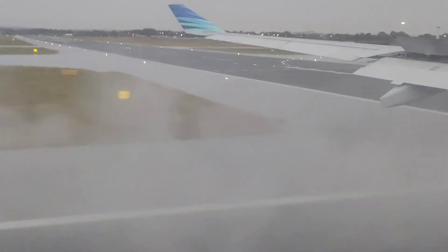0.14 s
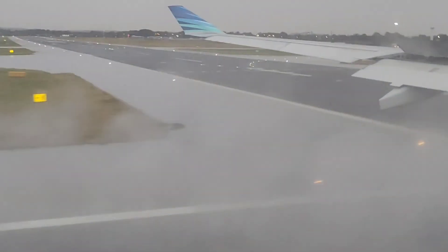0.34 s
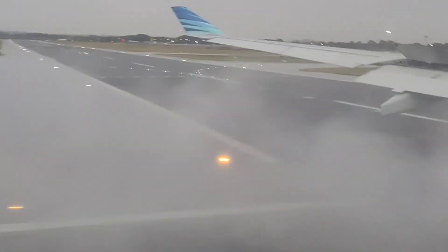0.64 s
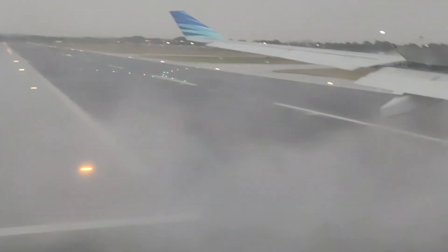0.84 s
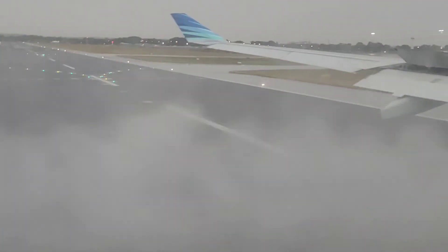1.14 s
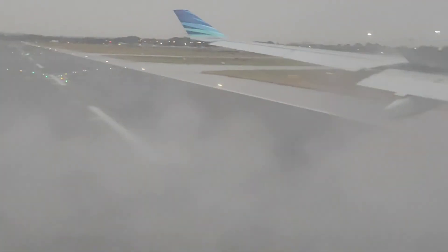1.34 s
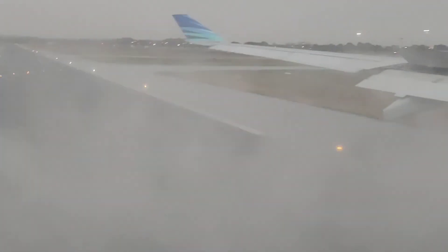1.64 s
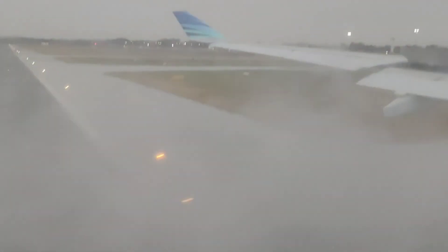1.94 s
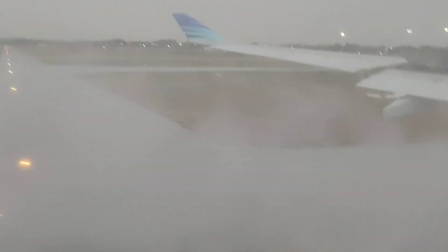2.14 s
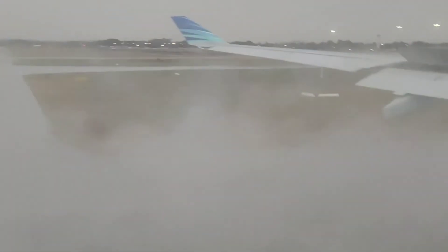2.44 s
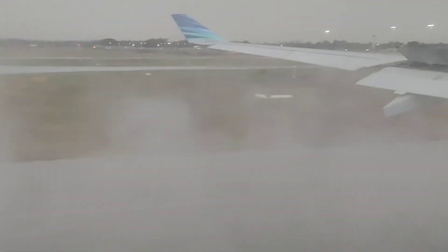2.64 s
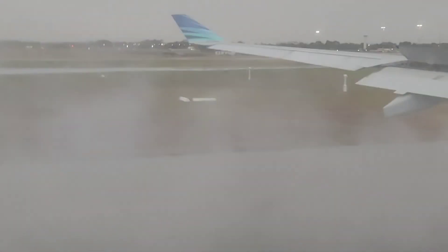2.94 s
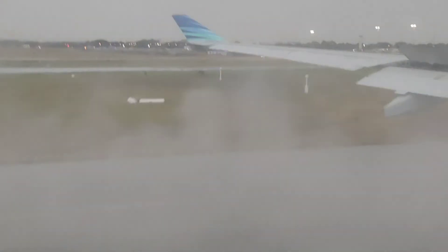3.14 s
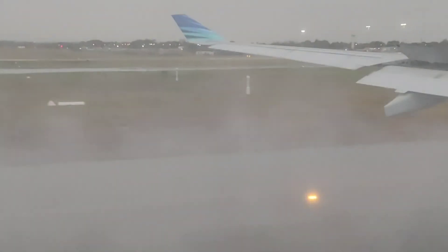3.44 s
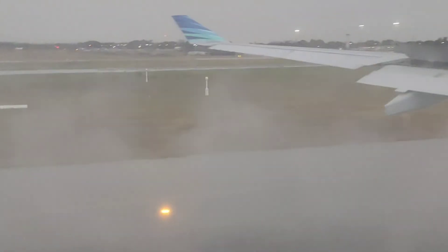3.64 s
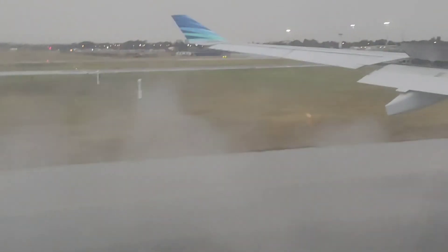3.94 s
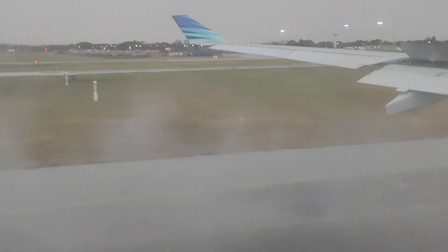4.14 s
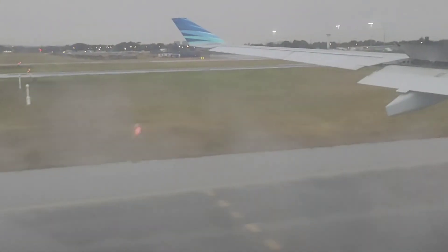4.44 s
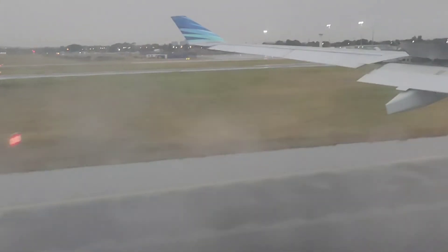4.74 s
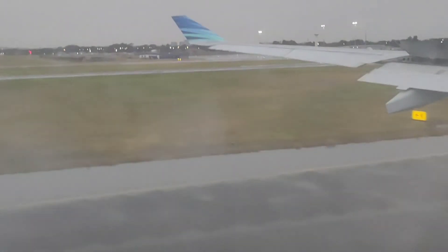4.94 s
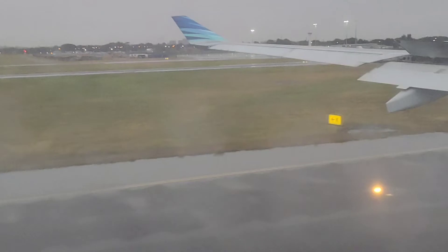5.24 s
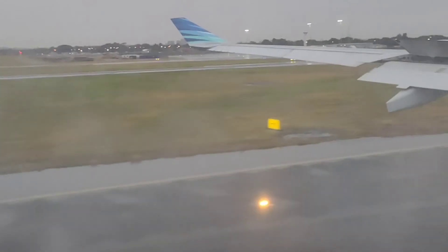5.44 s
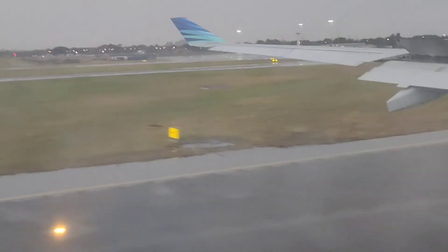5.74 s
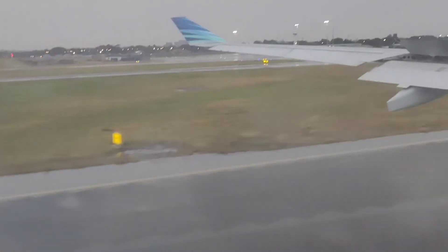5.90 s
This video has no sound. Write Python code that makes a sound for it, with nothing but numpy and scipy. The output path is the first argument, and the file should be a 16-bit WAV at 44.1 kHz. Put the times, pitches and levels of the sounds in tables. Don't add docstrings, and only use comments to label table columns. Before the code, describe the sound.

The sound begins abruptly at full strength inside an airliner cabin on a wet runway. From 0 to 3.6 s reverse thrust makes a thick, hollow boom, mostly low and low-mid, fluttering in irregular buffets several times a second. Wheels drum the floor in a deep uneven rumble, while muffled jet roar leaks through the wall with a much fainter airy edge. Vent hiss and a fuzzy, steady duct whistle lie far below. Jolts stir fine plastic rattling, with a cluster of ticks around 2.0 s and a sharper snap at 2.7 s. From 3.6 s the thrust eases gradually; wheel rumble stays relatively prominent. Around 4.9 s comes a crisp tick, and brief creaky panel rubs gather until about 5.2 s. The roar falls faster to 6 s, leaving a much softer low rumble with small trim noises. The close stereo microphone limits the loudest peaks.

```python
import sys
import numpy as np
from scipy import signal
from scipy.fft import rfft, irfft, next_fast_len
from scipy.io import wavfile
from scipy.ndimage import uniform_filter1d, minimum_filter1d

SR = 44100
rng = np.random.default_rng(int(sys.argv[2]) if len(sys.argv) > 2 else 0)


def transcribe(signal):
    frames = np.atleast_2d(signal).T
    limited = np.clip(frames, -1, 1)
    pcm = np.round(limited * 32767).astype(np.int16)
    wavfile.write(sys.argv[1], SR, pcm)


def level_to_linear(level):
    exponent = np.asarray(level, float) / 20
    return 10 ** exponent


N = 267687

# [f/Hz, width/Hz, level/dB]
CABIN_MODES = [(148.5, 22, 0), (187.1, 11, 2.5), (250.5, 42, 2.5), (295.4, 17, -4.5), (322.3, 29, -2),
               (348, 18, -6.5), (417.2, 39, -11.5), (447.7, 8.6, -13.5)]
# [f/Hz, density/dB per Hz]
BOOM_SPECTRUM = [(25, -30), (60, -13.5), (76, -4.5), (130, 6.5), (220, 3), (350, 4.5), (450, -6),
                 (490, -25), (560, -42.5), (1500, -110)]
# [t/s, deep boom level/dB, upper boom level/dB]
BUFFETS = [(0.051, -4, 4.5), (0.202, -1, -2), (.32, -2.5, 3), (.52, 4, 1.5), (.64, -9, -1.5), (.74, 1.5, 0),
           (.84, -4, 3), (1.03, -5, 2), (1.2, 1, 5), (1.331, 1, -3), (1.45, -1.5, 0), (1.58, 3, -3.5),
           (1.7, -2.5, -4.5), (1.82, 0.5, -1), (1.95, -2.5, -1.5), (2.08, -0.5, -10.5), (2.2, 2, -2),
           (2.32, -1, -2.5), (2.451, 2.5, 4), (2.599, -1.5, -3), (2.72, 0.5, 4), (2.87, -3.5, 0.5),
           (2.96, 4.5, -6.5), (3.08, 5, 3.5), (3.14, 7.5, -3), (3.21, 0, -3.5), (3.581, -2, 2.5),
           (3.63, 2, -9), (3.75, 5, 3), (3.902, -11, 1), (3.97, 4.5, -3.5), (4.2, -4, -1), (4.28, 4, -2.5),
           (4.461, -1, -5), (4.621, 1.5, -6), (4.72, 3, 3), (4.8, 7.5, -8), (5.06, -0.5, -2.5),
           (5.27, -2.5, 4.5), (5.341, 5.5, -1.5), (5.46, 3.5, -4.5), (5.58, 4.5, -1), (5.7, -2, -1),
           (5.85, -1, 0)]
# [t/s, level/dB]
HEAVES = [(.1, -1), (.3, 0), (.5, -1.5), (.7, -2.5), (.9, -1.5), (1.1, -2.5), (1.3, -4), (1.5, 0),
          (1.7, 1.5), (1.9, -1.5), (2.1, -2.5), (2.3, -3.5), (2.5, 0), (2.7, 3.5), (2.9, -1), (3.1, -1),
          (3.3, 0), (3.5, 3), (3.7, -2.5), (3.9, 0.5), (4.1, -0.5), (4.3, 0.5), (4.5, -1.5), (4.7, -1.5),
          (4.9, 0.5), (5.1, 1.5), (5.3, 3.5), (5.5, 1), (5.7, -2), (5.9, -2.5)]
# [t/s, level/dB]
FLEXES = [(.05, 2), (.25, 1.5), (.45, 3), (.65, -2), (.85, 1), (1.05, 2), (1.25, 1), (1.45, -0.5),
          (1.65, 1), (1.85, -1), (2.05, 0.5), (2.25, -1), (2.45, -1), (2.65, 1), (2.85, 0), (3.05, 2),
          (3.25, -2), (3.45, -2), (3.65, 2.5), (3.85, -1), (4.049, -4), (4.25, -1), (4.45, -2.5),
          (4.65, -1), (4.85, 0.5), (5.05, -3.5), (5.25, 2), (5.45, 0.5), (5.65, -1.5), (5.85, -1.5)]
# [t/s, level/dB]
SHIVERS = [(.1, 2.5), (.25, 3), (.4, 3), (.55, 3.5), (.7, 1), (.9, 2), (1.05, 1), (1.15, -2.5), (1.3, -0.5),
           (1.45, 1.5), (1.6, 2), (1.75, 0.5), (1.9, 1.5), (2.05, 0), (2.2, 1.5), (2.3, -1.5), (2.45, 0.5),
           (2.6, -0.5), (2.75, 3), (2.9, -2), (3.05, 3), (3.2, -4.5), (3.35, -1), (3.5, -2), (3.65, 0),
           (3.8, 0.5), (3.95, -1.5), (4.1, 0), (4.25, 2.5), (4.4, -2), (4.55, -0.5), (4.7, 1.5), (4.85, 0),
           (5.0, -4), (5.15, -1.5), (5.3, -1), (5.42, 4.5), (5.55, 3), (5.7, -1), (5.85, -1), (6.0, -2.5)]


def thrust():
    def shape(hz):
        return np.hypot(peaks(CABIN_MODES, hz), level_to_linear(read(BOOM_SPECTRUM, hz) - 13.0)) * (hz > 130)

    deep = air(lambda hz: shape(hz) * (hz < 220), size=8192, patchy_db=3.0, flicker_db=-1.5)
    upper = air(lambda hz: shape(hz) * (hz >= 220) * (hz < 310), size=8192, patchy_db=-0.3, flicker_db=0.5)
    panel = air(lambda hz: shape(hz) * (hz >= 310), size=8192, patchy_db=2.0, flicker_db=0.5)

    hz = np.fft.rfftfreq(N, 1 / SR)
    lowest = irfft(rfft(deep) * (hz < 168), N)
    deep = evened(deep - lowest)
    panes = irfft(rfft(panel) * (hz > 385), N)
    panel = evened(panel - panes)

    s, deep_db, upper_db = np.transpose(BUFFETS)
    deep_buffets_db = swells(s, deep_db, half_s=0.039)
    upper_buffets_db = swells(s, upper_db, half_s=0.039)
    heaves_db = swells(*np.transpose(HEAVES), half_s=0.1) + 0.8 * deep_buffets_db
    flexes_db = swells(*np.transpose(FLEXES), half_s=0.11)
    shivers_db = swells(*np.transpose(SHIVERS), half_s=0.15)

    out = steadied(evened(lowest), span_s=0.14) * level_to_linear(powered(level_db=-18, share=0.92) + heaves_db)
    out += steadied(evened(panes), span_s=0.35) * level_to_linear(powered(level_db=-28.5, share=0.98) + shivers_db)
    out += steadied(deep, span_s=0.21) * level_to_linear(powered(level_db=-17, share=0.92) + deep_buffets_db)
    out += steadied(upper, span_s=0.13) * level_to_linear(powered(level_db=-15.5, share=0.9) + upper_buffets_db)
    out += steadied(panel, span_s=0.23) * level_to_linear(powered(level_db=-20, share=0.97) + flexes_db)
    return out


# [f/Hz, width/Hz, level/dB]
FLOOR_MODES = [(81.6, 11, -0.31), (104.4, 12, 0.042)]
# [t/s, drum swell level/dB]
BUMPS = [(.05, 1.5), (0.539, 0.5), (.71, 5.5), (1.13, 5.5), (1.35, 1.5), (1.5, 0.5), (1.72, 3), (2.08, -2),
         (2.17, 4), (2.28, -4), (2.42, 7), (2.68, 1), (2.79, 2), (2.97, 4), (3.27, 5.5), (3.45, 6.5),
         (3.65, 9), (3.851, 5.5), (4.09, -2), (4.17, 6.5), (4.33, 6.5), (4.57, 6), (4.77, 3), (4.95, 7),
         (5.15, 5), (5.55, 4.5), (5.9, 1)]


def wheels():
    def floor(hz):
        return np.hypot(peaks(FLOOR_MODES, hz), level_to_linear(read(BOOM_SPECTRUM, hz) - 7.0)) * (hz > 62) * (hz <= 130)

    def shell(hz):
        return level_to_linear(read(BOOM_SPECTRUM, hz)) * (hz <= 62)

    drum = air(floor, size=8192, patchy_db=-1.3, flicker_db=-0.5)
    heave = air(shell, size=8192, patchy_db=3.0, flicker_db=-3.5)
    bumps_db = swells(*np.transpose(BUMPS), half_s=0.068)
    drum = steadied(drum, span_s=0.16) * level_to_linear(powered(level_db=-21.5, share=0.21) + bumps_db)
    return drum + steadied(heave, span_s=0.27) * level_to_linear(-42)


# [f/Hz, density/dB per Hz]
DULL_SPECTRUM = [(300, -33), (460, -3), (500, -1.5), (550, -5.5), (640, -9.5), (1050, -14), (1400, -25)]
# [f/Hz, density/dB per Hz]
BRIGHT_SPECTRUM = [(1400, 2), (1650, 3), (2000, -1), (2400, -6.5), (2800, -10.5), (3300, -15.5),
                   (4200, -19), (5000, -28), (7000, -44.5), (12000, -81.5)]
# [t/s, level/dB]
GUSTS = [(.16, 0.5), (0.211, -1), (.38, 0), (.5, 3), (.6, -2.5), (.73, 4), (.8, -3), (.92, 1.5),
         (1.3, -1.5), (1.43, 0), (1.55, -1), (1.85, 2), (1.92, -2), (2.11, -1), (2.26, -2.5), (2.37, 2),
         (2.53, -1.5), (2.75, 1.5), (3.07, 1.5), (3.19, -2), (3.35, 1.5), (3.451, -2), (3.6, -0.5),
         (4.1, 1), (4.7, -1.5), (4.97, 1), (5.14, 2.5), (5.33, -1), (5.5, 0)]


def roar():
    dull = air(lambda hz: level_to_linear(read(DULL_SPECTRUM, hz)) * (hz < 1400),
               size=1024, patchy_db=1.1, flicker_db=-1.03)
    bright = air(lambda hz: level_to_linear(read(BRIGHT_SPECTRUM, hz)) * (hz >= 1400),
                 size=512, patchy_db=0.93, flicker_db=0.9)
    gusts_db = swells(*np.transpose(GUSTS), half_s=0.096)
    jolts_db = shaking()
    dull_db = powered(level_db=-32.5, share=0.8) + gusts_db + 0.17 * jolts_db
    bright_db = powered(level_db=-49, share=0.45) + 0.63 * gusts_db + 0.33 * jolts_db
    return steadied(dull, span_s=0.42) * level_to_linear(dull_db) + steadied(bright, span_s=0.3) * level_to_linear(bright_db)


# [t/s, peak level/dB, left minus right/dB, ring t60/s]
TICKS = [(0.6605, -53, -2, 0.033), (0.728, -54.5, 0.5, 0.02), (0.9487, -55, 3, 0.033),
         (1.063, -52.5, 4, 0.024), (1.1739, -47.5, -4, 0.03), (1.988, -46, 7, 0.03),
         (2.0128, -49, 3, 0.024), (2.0439, -42, 4, 0.03), (2.066, -46, 1.5, 0.03),
         (2.349, -48.5, 7.5, 0.028), (2.592, -49, 5, 0.041), (2.696, -36.5, 5, 0.024),
         (2.9993, -55.5, 2.5, 0.033), (3.58, -47.5, 3, 0.034), (3.745, -51, 1, 0.02),
         (4.345, -52, 2.5, 0.02), (4.414, -53, -1, 0.036), (4.855, -51, 4, 0.015),
         (4.8666, -36.5, 9, 0.012), (4.883, -53, 6, 0.015), (4.9238, -48, 5.5, 0.03),
         (5.031, -51, 1.5, 0.021), (5.18, -53.5, 3, 0.027), (5.4697, -52, 5.5, 0.027),
         (5.7236, -47, 2, 0.033), (5.929, -53.5, 3.5, 0.03)]
# [f/Hz, density/dB per Hz]
TICK_SPECTRUM = [(1470, -35), (2500, -6), (4870, -8), (5930, -19), (6450, -3), (7010, -11.5), (7970, 1.5),
                 (10800, -1), (15300, -3)]


def ticks():
    points = [(0, 0.0067)] + [(f, level_to_linear(db)) for f, db in TICK_SPECTRUM] + [(SR / 2, 0)]
    colour = signal.firwin2(129, *np.transpose(points), fs=SR)
    length = 3000
    t = np.arange(length) / SR
    out = np.zeros((2, N + length))
    for s, db, pan_db, t60 in TICKS:
        burst = evened(np.convolve(rng.standard_normal(length), colour, "same"))
        burst *= level_to_linear(db - 6.5 - 60 * t / t60) * (1 - np.exp(-t / 0.001))
        start = round(s * SR)
        out[:, start:start + length] += burst * level_to_linear([[pan_db / 2], [-pan_db / 2]])
    return out[:, :N]


# [t/s, length/s, f/Hz, width/Hz,
# level/dB]
RUBS = [(4.63, .15, 10200, 800, -68), (4.72, .07, 14200, 1200, -70.5), (4.79, 0.1, 3140, 200, -64.5),
        (4.99, .05, 3080, 200, -63.5), (5.09, .04, 1600, 100, -57), (4.93, .03, 4500, 1800, -66),
        (4.1, .04, 2670, 150, -60.5), (4.9, .03, 1620, 78, -54), (4.82, .4, 2300, 1200, -59.5),
        (5.4, 0.07, 2700, 900, -61.5), (5.045, .1, 2200, 190, -52), (3.55, .12, 12800, 1500, -72.5),
        (4.3, .1, 13200, 1200, -72), (4.52, .08, 7600, 1500, -68.5), (5.2, .08, 14500, 900, -74.5),
        (4.9, .1, 7000, 1200, -66.5), (5.62, 0.11, 2600, 300, -67), (3.947, 0.16, 6900, 710, -69.5),
        (4.404, .025, 2900, 400, -54), (5.02, .02, 2600, 1500, -56), (5.17, .02, 2500, 1800, -53.5),
        (5.965, .02, 2900, 2000, -57.5), (2.693, .014, 3600, 2000, -62.5), (5.2, 0.048, 1050, 60, -50)]


def rubs():
    t = np.arange(N) / SR
    out = np.zeros((2, N))
    stutter_db = 2.6 * evened(uniform_filter1d(rng.standard_normal(N), size=300))
    for s, length_s, f, width, db in RUBS:
        stroke = np.sin(np.pi * np.clip((t - s) / length_s, 0, 1))
        out += level_to_linear(db + stutter_db) * stroke * ring(f, width)
    return out


# [f/Hz, density/dB per Hz]
HISS_SPECTRUM = [(3000, -29.5), (4500, -4), (5600, -8.5), (6600, 0.5), (7900, -1), (8800, 0.5),
                 (9600, -4.5), (11300, -10.5), (13200, -6), (15300, -9)]


def rattle():
    body = air(lambda hz: level_to_linear(read(HISS_SPECTRUM, hz)) * (hz < 9500),
               size=256, patchy_db=1.0, flicker_db=1.5)
    top = air(lambda hz: level_to_linear(read(HISS_SPECTRUM, hz)) * (hz >= 9500),
              size=512, patchy_db=3.0, flicker_db=0.5)
    jolts_db = shaking()
    loosening_db = 0.96 * np.arange(N) / SR
    return body * level_to_linear(-68 + 0.99 * jolts_db) + top * level_to_linear(-74 + 1.4 * jolts_db + loosening_db)


# [f/Hz, width/Hz, level/dB]
DUCT_WHISTLES = [(1650, 80, -62), (1570, 30, -72)]


def ducts():
    return sum(level_to_linear(db) * ring(f, width) for f, width, db in DUCT_WHISTLES)


# [t/s, level/dB]
THRUST = [
    (0, -0.5),
    (1.3, 1),
    (2.6, 1),
    (3.6, 0.5),
    (4.3, -2),
    (4.8, -4),
    (5.4, -7.5),
    (6.07, -11.5),
]


def powered(level_db, share):
    s, power_db = np.transpose(THRUST)
    return level_db + share * np.interp(np.arange(N) / SR, s, power_db)


# [t/s, half length/s, level/dB]
JOLTS = [(0.018, .08, 2), (0.362, 0.064, 2), (0.691, 0.046, 5), (0.944, .06, 3), (1.08, .025, 6.5),
         (1.181, 0.024, 5.5), (1.456, 0.053, 1), (1.785, .09, 3), (2.042, 0.054, 9), (2.15, 0.028, 7),
         (2.373, .04, 6), (2.46, 0.027, 6.5), (2.615, .05, 5), (2.708, .04, 6), (2.845, 0.088, 3),
         (3.02, 0.061, 5.5), (3.302, 0.11, 4), (3.686, 0.2, 5), (4.04, 0.066, 5), (4.19, 0.082, 4.5),
         (4.412, .025, 3.5), (4.717, .07, 4.5), (4.889, .05, 8), (5.023, .06, 3), (5.219, .04, 2),
         (5.439, .03, 4), (5.618, .06, 2.5), (5.727, .015, 4), (5.96, 0.029, 4.5)]


def shaking():
    s, half_s, db = np.transpose(JOLTS)
    return swells(s, db, half_s)


def swells(times, heights_db, half_s):
    t = np.arange(0, N, 64) / SR
    humps = np.exp(-((t[:, None] - times) / half_s) ** 2) @ heights_db
    return np.interp(np.arange(N) / SR, t, humps)


# [f/Hz, correlation/1]
LIKENESS = [(40, 0.99), (140, 0.97), (330, 0.98), (500, 0.59), (760, -0.083), (1170, -0.41), (1780, -.22),
            (2720, 0), (4160, 0), (6800, 0.6), (7900, .72), (9500, .7), (12000, 0.52), (13200, .3),
            (15000, .45)]
# [f/Hz, left minus right/dB]
BALANCE = [(60, 0.5), (92, 1), (140, -1), (210, 1), (330, -0.5), (500, -2.5), (760, 4.5), (1170, -1),
           (1780, 5.5), (2720, -3.5), (4160, -2), (6360, 9.5), (9720, -3), (14800, 5.5)]


def air(shape, size, patchy_db, flicker_db):
    frames = 4 * N // size + 5
    hz = np.fft.rfftfreq(size, 1 / SR)
    a, b, c, d, patches = rng.standard_normal((frames, len(hz), 5)).T
    patches = uniform_filter1d(patches, size=8, axis=0)
    patches = evened(uniform_filter1d(patches, size=12, axis=1))
    flicker = evened(uniform_filter1d(rng.standard_normal(frames), size=4))

    same = np.clip(read(LIKENESS, hz), -1, 1)[:, None]
    left = a + 1j * b
    right = same * left + np.sqrt(1 - same ** 2) * (c + 1j * d)
    z = np.array([left, right])
    z *= level_to_linear(np.multiply.outer([0.5, -0.5], read(BALANCE, hz)))[:, :, None]
    z *= shape(hz)[:, None] * level_to_linear(patchy_db * patches + flicker_db * flicker)
    return evened(signal.istft(z, nperseg=size, noverlap=3 * size // 4)[1][:, :N])


def ring(centre_hz, width_hz):
    size = next_fast_len(N)
    hz = np.fft.rfftfreq(size, 1 / SR)
    z = rfft(rng.standard_normal((2, N)), size)
    z[1] += 0.22 * z[0]
    return evened(irfft(z * peaks([(centre_hz, width_hz, 0)], hz), size)[:, :N])


def peaks(modes, hz):
    return np.sqrt(sum(level_to_linear(2 * db) / (1 + (2 * (hz - f) / w) ** 2) ** 2 for f, w, db in modes))


def read(points, hz):
    f, value = np.transpose(points)
    return np.interp(np.log(hz + 1), np.log(f + 1), value)


def evened(x):
    return x / np.sqrt(np.mean(x ** 2) + 1e-20)


def steadied(x, span_s):
    window = np.hanning(int(span_s * SR)) / (span_s * SR / 2)
    power = signal.oaconvolve((x ** 2).mean(0), window, "same")
    return x / np.sqrt(power + 0.15)


def scene():
    return thrust() + wheels() + roar() + ticks() + rubs() + rattle() + ducts()


def band_limit(x):
    return signal.sosfilt(signal.butter(12, 15450, fs=SR, output="sos"), x)


def record(dry):
    power_db = 10 * np.log10(uniform_filter1d((dry ** 2).max(0), size=200) + 1e-12)
    fall_db = np.arange(N) * 60.0 / SR
    held_db = np.maximum.accumulate(power_db + fall_db) - fall_db
    over_db = np.maximum(held_db + 7.0, 0)
    held = dry * level_to_linear(1.25 - 0.72 * uniform_filter1d(over_db, size=200))

    room = np.minimum(0.94 / (abs(held).max(0) + 1e-9), 1)
    room = minimum_filter1d(room, size=401)
    held = held * uniform_filter1d(uniform_filter1d(room, size=200), size=200)
    mix = held * np.interp(np.arange(N) / SR, [0, 0.006], [0.2, 1])
    return band_limit(mix)


dry = scene()
out = record(dry)
transcribe(out)
```